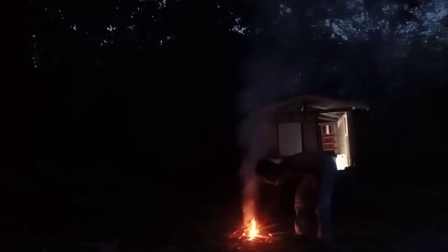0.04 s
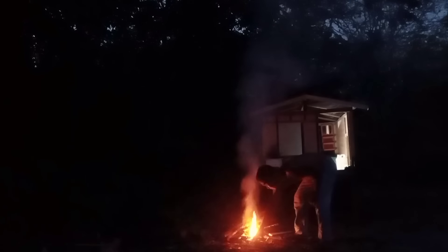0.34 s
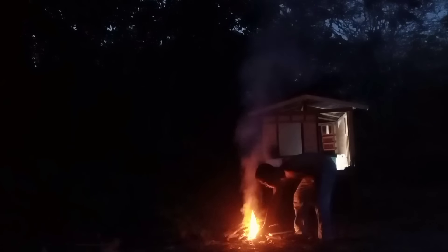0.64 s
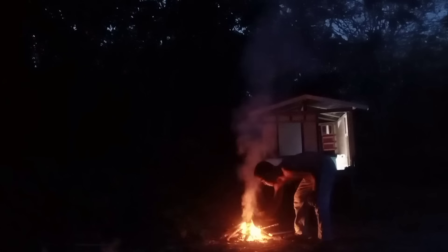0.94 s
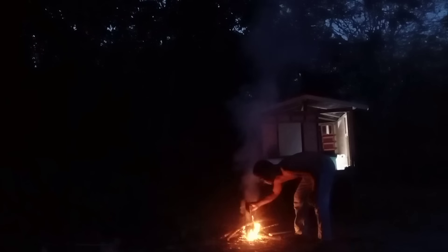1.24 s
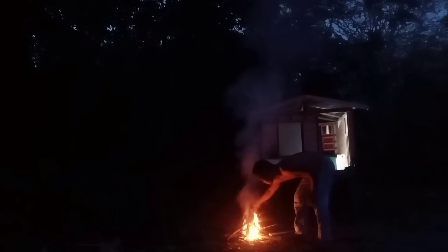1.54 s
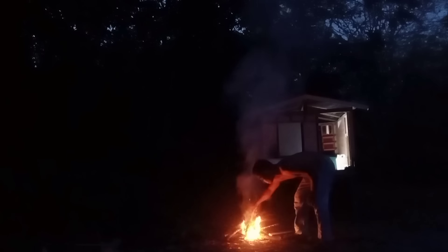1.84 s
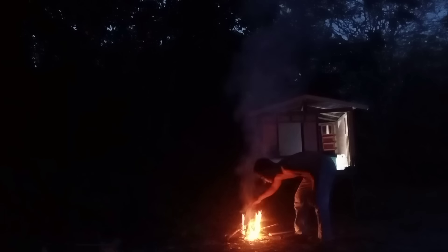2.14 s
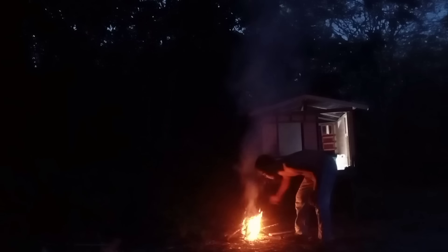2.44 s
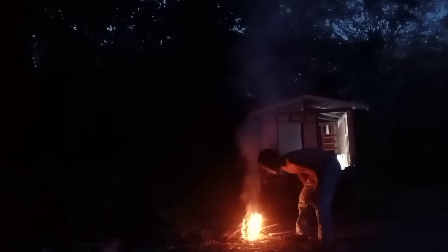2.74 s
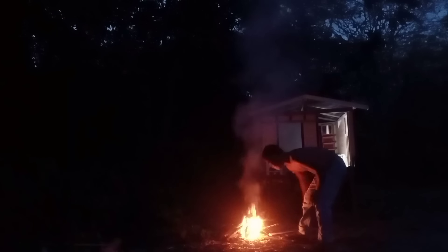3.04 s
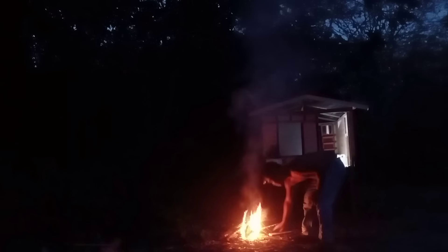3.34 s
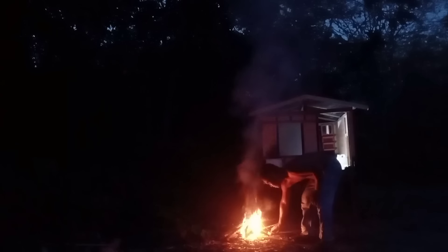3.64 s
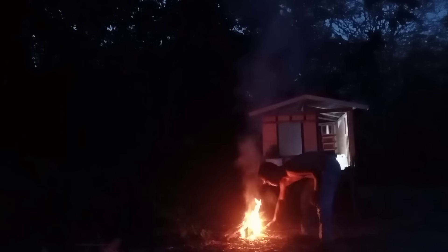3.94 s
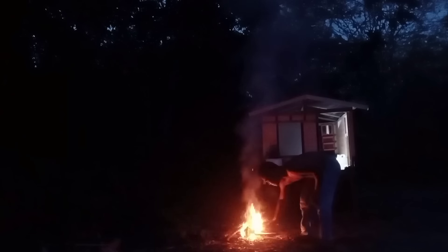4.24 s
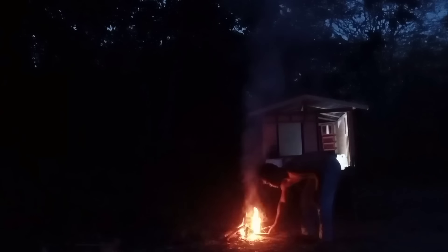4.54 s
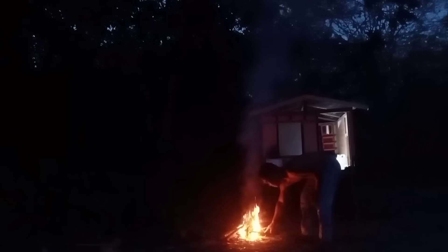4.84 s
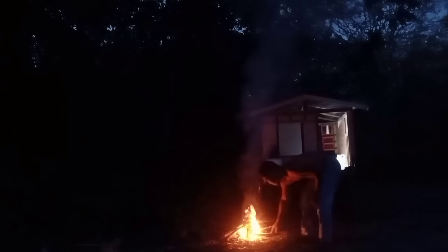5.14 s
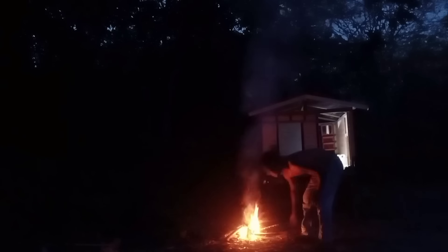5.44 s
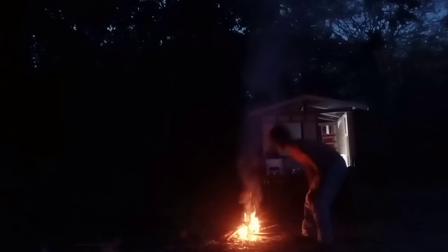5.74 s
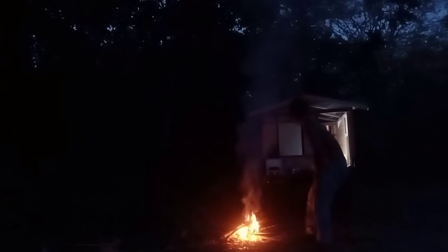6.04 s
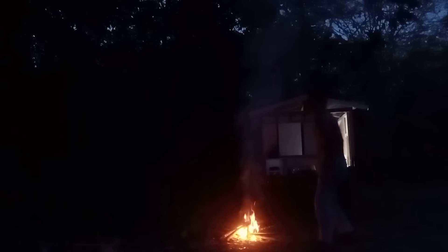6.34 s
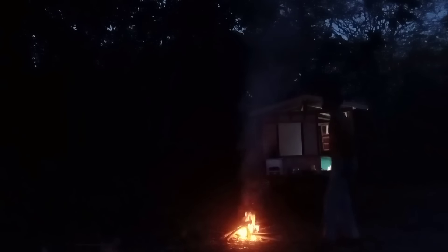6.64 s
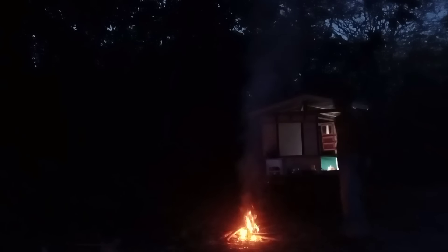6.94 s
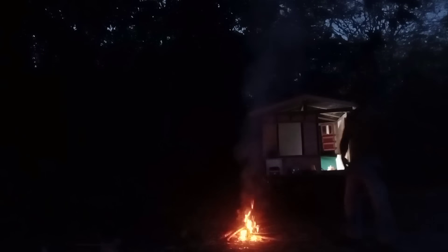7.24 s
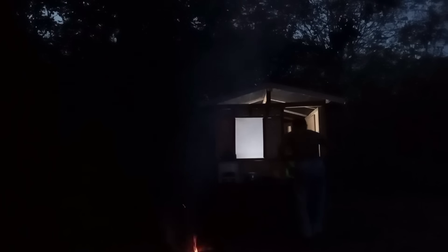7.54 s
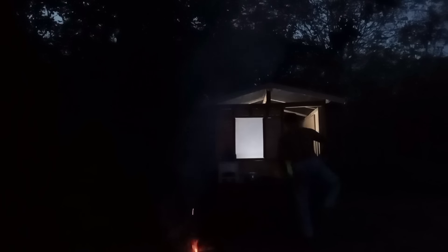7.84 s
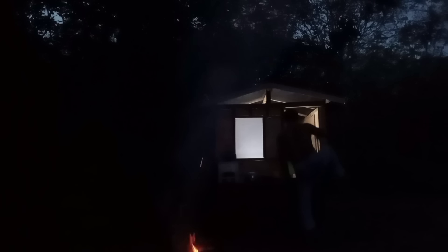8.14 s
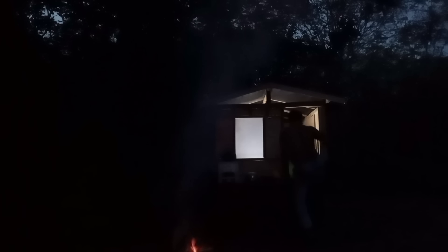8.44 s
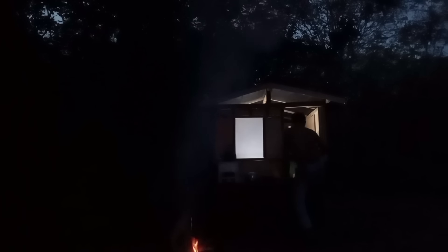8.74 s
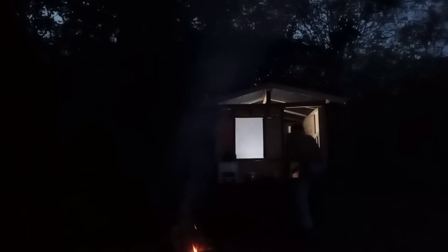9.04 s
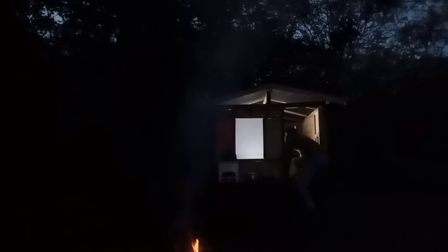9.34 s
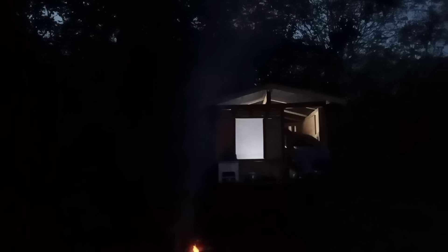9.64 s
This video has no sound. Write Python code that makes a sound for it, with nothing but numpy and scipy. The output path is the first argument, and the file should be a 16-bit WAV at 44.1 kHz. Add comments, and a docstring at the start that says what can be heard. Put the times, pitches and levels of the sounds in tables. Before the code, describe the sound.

Crickets chirp and small frogs whistle in a night forest while a campfire ticks and gives a few sharp snaps.

```python
"""Crickets chirp close to the microphone and small frogs answer with a whistle and a low note.
It is night at a forest clearing. Other crickets sweep down in pitch as their wings slow, bush
crickets hiss in the canopy, more frogs call from far back; the trunks scatter calls into a short wash.
A campfire ticks and snaps while someone feeds it dry twigs and then walks off to a hut."""
import sys
import numpy as np
from scipy import signal
from scipy.fft import rfft, irfft, next_fast_len
from scipy.io import wavfile

SR = 44100
rng = np.random.default_rng(int(sys.argv[2]) if len(sys.argv) > 2 else 0)


def wrap_up_sound(samples):
    """Save the sound to the file named by the first command line argument, as 16-bit audio."""
    columns = np.atleast_2d(samples).T
    # keep every value between -1 and 1, then stretch to whole-number steps
    tamed = np.clip(columns, -1, 1)
    steps = np.round(tamed * 32767).astype(np.int16)
    wavfile.write(sys.argv[1], SR, steps)


N = 435708
TIME = np.arange(N) / SR


def undb(db):
    """Decibels to gain."""
    return 10 ** (np.asarray(db) / 20)


def unit(x):
    """Scale to an rms of one."""
    return x / np.sqrt(np.mean(x ** 2))


def peak(x):
    """Scale to a peak of one."""
    return x / np.max(np.abs(x))


def curve(rows, at=TIME):
    """Read off the straight lines that join (position, value) rows."""
    return np.interp(at, *np.transpose(rows))


def add(out, s, x):
    """Mix x into out from time s on."""
    i = int(round(s * SR))
    x, i = x[max(-i, 0):], max(i, 0)
    out[i:i + len(x)] += x[:max(len(out) - i, 0)]


def equalise(x, points):
    """Filter x by a response of (Hz, dB) points."""
    hz, db = np.transpose(points)
    size = next_fast_len(len(x))
    f = np.maximum(np.fft.rfftfreq(size, 1 / SR), 1)
    return irfft(rfft(x, size) * undb(np.interp(np.log(f), np.log(hz), db)), size)[:len(x)]


def colour(x, points):
    """Filter x by (Hz, dB) points and scale to an rms of one."""
    return unit(equalise(x, points))


def resonate(x, hz, width):
    """A resonance applied twice, for steep skirts."""
    b, a = signal.iirpeak(min(hz, .45 * SR), hz / width, fs=SR)
    return signal.lfilter(b, a, signal.lfilter(b, a, x))


def wander(rate):
    """Random drift with a spread near one, turning rate times a second."""
    steps = rng.standard_normal(2048)
    return np.interp(TIME * rate, np.arange(len(steps)), steps)


def tone(hz, shape):
    """A gliding sine whose rms is one where its envelope is one."""
    return np.sqrt(2) * shape * np.sin(2 * np.pi * (np.cumsum(hz) / SR + rng.random()))


def progress(length):
    """Run from 0 to 1 through a note of this length in seconds."""
    return np.linspace(0, 1, max(int(length * SR), 8))


def waver(u, depth):
    """A gain that wavers around one through a note."""
    return 1 + depth * np.interp(u, np.linspace(0, 1, 8), rng.standard_normal(8))


def swell(s, length, db):
    """A smooth rise and fall centred on time s."""
    return undb(db) * np.exp(-np.minimum((2 * (TIME - s) / length) ** 2, 50))


def echoes(t60, onset, patchy_db=7):
    """The paths from perch to microphone: many weak echoes off leaves, a few strong ones off trunks."""
    t = np.arange(SR // 2) / SR
    sizes = rng.standard_normal(len(t)) * undb(patchy_db * rng.standard_normal(len(t)))
    arrivals = rng.random(len(t)) < .1
    return sizes * arrivals * (1 - np.exp(-t / onset)) * np.exp(-np.log(1000) * t / t60)


def forest(call, paths):
    """The forest scatters a call into a fading wash of the same energy."""
    wash = signal.fftconvolve(call, paths)
    return wash * np.sqrt(np.sum(call ** 2) / np.sum(wash ** 2))


# The air all round the clearing. Each row: frequency in Hz, relative level in dB.
AIR_SPECTRUM = [(20, -23), (40, -8.5), (60, 5), (80, 5), (150, 3.5), (250, -2.5), (500, -7.5),
                (1100, -13.5), (1600, -10.5), (4000, -3.5), (10000, -10), (12500, -26.5), (15500, -21)]
def still_air(level_db=-60.5):
    """A faint bed of noise that stirs slightly."""
    return undb(level_db + wander(5.5)) * colour(rng.standard_normal(N), AIR_SPECTRUM)


# Far off among the trees. Each row: centre in Hz, nominal width in Hz, level in dB.
CHORUS_BANDS = [(1962, 276, -59), (2752, 320, -50.5), (3745, 240, -73), (5340, 540, -57.5),
                (6759, 380, -44)]
def far_chorus(throb_db=2):
    """Countless far callers merge into throbbing bands."""
    out = np.zeros(N)
    for hz, width, db in CHORUS_BANDS:
        band = resonate(rng.standard_normal(N), hz, 1.8 * width)
        band = resonate(band, hz, 1.8 * width)
        out += undb(db + throb_db * wander(11)) * unit(band)
    return out


# The hiss from the canopy overhead. Each row: time in seconds, level in dB.
CANOPY_LEVELS = [(0, -50.5), (.9, -47.5), (2.25, -52.5), (3.1, -45), (4.1, -43.5), (4.8, -44.5),
                 (6.2, -45.5), (6.7, -44.5), (7.5, -44.5), (7.65, -48.5), (9.88, -44.5)]
# Its colour. Each row: frequency in Hz, relative level in dB.
WING_SPECTRUM = [(5800, -37), (6700, -1), (7300, 6.5), (8000, 2), (8700, -1.5), (9500, -5.5), (10200, -27),
                 (11200, -34.5), (12200, -31), (15000, -55)]
def bush_crickets(rasp_db=1.32, ripple_db=2):
    """A rasping hiss, finely rippled with many close peaks."""
    hz = np.arange(5800, 15000, 35)
    wing_db = curve(WING_SPECTRUM, hz) + ripple_db * rng.standard_normal(len(hz))
    level = undb(curve(CANOPY_LEVELS) + rasp_db * wander(110))
    return level * colour(rng.standard_normal(N), np.column_stack([hz, wing_db]))


# Deep in the forest. Each row: start in seconds, number of calls, period in seconds, pitch in Hz,
# level in dB.
DEEP_BOUTS = [(.25, 7, .275, 3050, -48.5), (6.76, 4, 0.19, 3510, -49), (8.68, 3, .24, 3400, -57.5)]
def deep_callers(length=.0612, rise_hz=300):
    """Drawn-out rising calls at an even pace, so distant that only their echoes reach the microphone."""
    out, u = np.zeros(N), progress(length)
    for start, calls, period, hz, db in DEEP_BOUTS:
        for s in start + period * np.arange(calls):
            call = tone(hz + rise_hz * (u - .5), np.sin(np.pi * u))
            add(out, s, undb(db) * forest(call, echoes(t60=.2, onset=.017, patchy_db=-2.5)))
    return out


# Out of sight behind the trees. Each row: pitch in Hz, its spread in Hz, wash level in dB,
# calls per second.
HIDDEN_FROGS = [(2004, 45, -45.5, 8), (2680, 78, -41, 8), (3044, 70, -47, 3)]
def far_frogs(length=.0164, rise_hz=380, scatter_db=2, direct_db=-4):
    """Distant frogs keep a loose rhythm; their short pips are half lost in echoes."""
    out, u = np.zeros(N), progress(length)
    for hz, spread_hz, db, rate in HIDDEN_FROGS:
        for k, (late, sharp, loud) in enumerate(rng.standard_normal((int(rate * N / SR) + 1, 3))):
            pitch = hz + spread_hz * sharp + rise_hz * (u - .5)
            call = undb(db + scatter_db * loud) * tone(pitch, np.sin(np.pi * u))
            s = (k + .2 * late) / rate
            add(out, s, undb(direct_db) * call)
            add(out, s, forest(call, echoes(t60=.094, onset=.014)))
    return out


# Steps and bumps on the clearing's floor. Each row: centre and length in seconds, level in dB,
# pitch in Hz.
GROUND_THUDS = [(1.572, 0.051, -59.5, 330), (4.78, 0.094, -58, 170), (7.534, 0.14, -56, 140),
                (8.782, 0.12, -54, 106), (9.277, 0.19, -60, 83.4), (9.565, 0.27, -64.5, 113),
                (9.79, 0.18, -53, 131)]
def footfalls():
    """The ground answers each step or bump with a dull swell of low noise."""
    return sum(swell(s, length, db) * unit(resonate(rng.standard_normal(N), hz, .98 * hz))
               for s, length, db, hz in GROUND_THUDS)


def grains(rate, uneven_db=.5):
    """Random clicks of uneven size, about rate a second."""
    clicks = (rng.random(N) < rate / SR) * rng.standard_normal(N)
    return clicks * undb(uneven_db * np.minimum(rng.exponential(size=N), 3))


# Leaves and twigs pushed or trodden around the fire. Each row: centre and length in seconds,
# relative level in dB.
LEAF_RUSTLES = [(.62, 0.083, -57.5), (.74, 0.086, -58.5), (.87, 0.096, -60.5), (1.09, 0.21, -56),
                (1.58, 0.2, -68), (1.96, 0.11, -67.5), (3.28, 0.081, -48), (4.31, .31, -64.5),
                (4.42, .051, -57), (5.0, 0.095, -61), (6.59, 0.063, -54.5), (7.54, 0.083, -50),
                (9.35, 0.12, -65.5), (9.78, 0.085, -64)]
# Their colour. Each row: frequency in Hz, relative level in dB.
LEAF_SPECTRUM = [(80, -11), (200, -7), (400, -6.5), (600, -3), (850, -3.5), (1050, -1.5), (1350, 4),
                 (2200, -3), (4000, 0), (9000, -7), (12500, -17), (15000, -19)]
def dry_leaves(gain_db=3, jerk_db=2, twig_db=-7):
    """Dry leaves crunch in jerks of tiny grains and set twigs ringing."""
    twigs = sum(resonate(grains(70), hz, width=150) for hz in np.geomspace(720, 1500, 6))
    crunch = colour(grains(2200), LEAF_SPECTRUM) + undb(twig_db) * unit(twigs)
    pushes = sum(swell(*row) for row in LEAF_RUSTLES)
    return undb(gain_db + jerk_db * wander(60)) * pushes * crunch


# Crickets near and far. Each row: start in seconds, number of calls, base level in dB,
# direct sound in dB against that base.
SWEEP_BOUTS = [(.07, 2, -40.5, -20), (.430, 4, -28, -1.5), (1.415, 2, -40.5, -20), (1.87, 4, -38.5, -26.5),
               (1.98, 3, -38, -20), (2.74, 5, -40, -20), (3.938, 2, -27, -2), (4.535, 2, -28.5, -1),
               (4.99, 10, -41, -20), (7.109, 2, -27, -1.5), (7.55, 1, -39.5, 1), (7.76, 7, -39.5, -20),
               (9.216, 3, -28.5, -1)]
def sweeping_crickets(length=.026, gap=.036, period=.2225, top_hz=5850, bottom_hz=4380, hidden_db=-10):
    """The wing slows in each of three strokes, so each falls in pitch; far callers arrive as wash only."""
    out, u = np.zeros(N), progress(length)
    fall_hz = top_hz + (bottom_hz - top_hz) * u
    for start, calls, db, direct_db in SWEEP_BOUTS:
        for n in range(calls):
            s, call = start - length / 2 + n * period, np.zeros(SR // 7)
            first_db = -3 if n else -5  # a bout's opening stroke is the softest
            for k, size in enumerate(undb([first_db, 0, 0])):
                pitch = fall_hz * (1 + .0082 * rng.standard_normal())
                add(call, k * gap, size * tone(pitch, np.sin(np.pi * u) ** 2.6))
            if direct_db > hidden_db:
                add(out, s, undb(db + direct_db) * call)
                add(out, s, undb(db - 6) * forest(call, echoes(t60=.55, onset=.04, patchy_db=2)))
            else:
                add(out, s, undb(db - 3) * forest(call, echoes(t60=.28, onset=.005, patchy_db=2)))
    return out


def wood_burst(hz, width, decay, tail_db, tail_decay):
    """A crack of noise with a faint scattered tail, rung through one resonance; its peak is one."""
    t = np.arange(SR // 5) / SR
    envelope = np.exp(-t / decay) + undb(tail_db) * np.exp(-t / tail_decay)
    return peak(resonate(rng.standard_normal(len(t)) * envelope, hz, width))


# Burning wood near the microphone. Each row: start in seconds, peak of the crack in dB,
# weight of the wood's body in dB.
FIRE_SNAPS = [(0.275, -31, -17), (0.8749, -34, -12), (1.7775, -30, -16), (2.5238, -32, -20),
              (3.506, -42, -12), (3.726, -39, -15), (4.751, -10.5, -12.5), (5.3640, -20.5, -25),
              (5.4017, -35, -22), (5.615, -33, -10.5), (7.013, -8.5, -11.5), (7.2067, -14, -41)]
# Sticks knocked together at the fireside. Each row: start in seconds, peak in dB, pitch in Hz.
STICK_KNOCKS = [(1.561, -41, 1090), (1.8135, -35.5, 1230), (1.877, -37.5, 810), (2.8235, -48.5, 900),
                (4.42, -45, 880), (9.628, -43, 1240)]
def campfire(thump_db=-16, ticks=55, softest_tick_db=-49, ticks_until_s=7.4):
    """Wood splits with a sharp crack, a duller body and a low thump; sticks knock; embers tick."""
    out = np.zeros(N)
    for s, db, body_db in FIRE_SNAPS:
        crack_hz = np.interp(body_db, [-40, -12], [11000, 7500])  # less body, thinner crack
        crack = wood_burst(crack_hz, width=10200, decay=.00032, tail_db=-29, tail_decay=.019)
        body = wood_burst(hz=1250, width=2600, decay=.0029, tail_db=-15.5, tail_decay=.018)
        thump = wood_burst(hz=320, width=260, decay=.0038, tail_db=-18, tail_decay=.028)
        wood = undb(body_db - 6.5) * (body + undb(thump_db) * thump)
        add(out, s, undb(db) * (crack + wood))
    for s, db, hz in STICK_KNOCKS:
        knock = wood_burst(hz, width=1200, decay=.0044, tail_db=-14.5, tail_decay=.023)
        add(out, s, undb(db) * knock)
    for when, size in rng.random((ticks, 2)):
        tick = wood_burst(hz=11000, width=9000, decay=.0004, tail_db=-28, tail_decay=.005)
        add(out, ticks_until_s * when, undb(softest_tick_db + 10 * size ** 2) * tick)
    return out


# The near frogs' two-note calls. Each row: time in seconds, nominal pitch of the whistle in Hz.
NEAR_FROG_CALLS = [(0.068, 2574), (.24, 2610), (0.444, 2605), (.645, 2620), (.81, 2665), (.985, 2594),
                   (1.17, 2600), (1.509, 2566), (1.71, 2700), (1.974, 2670), (2.25, 2673), (2.473, 2843),
                   (2.679, 2740), (2.889, 2846), (3.078, 2700), (3.336, 2790), (3.535, 2856), (3.735, 2730),
                   (3.884, 2734), (4.063, 2803), (4.302, 2820), (4.455, 2920), (4.64, 2780), (4.794, 2950),
                   (4.978, 2760), (5.181, 2950), (5.329, 2815), (5.486, 3006), (5.632, 2804), (5.781, 3014),
                   (5.938, 2787), (6.063, 3065), (6.177, 2860), (6.309, 2845), (6.441, 3070), (6.566, 2840),
                   (6.731, 2937), (6.95, 3106), (7.103, 2750), (7.161, 2867), (7.285, 2770), (7.392, 3036),
                   (7.55, 2950), (7.737, 2730), (7.873, 2954), (8.069, 2925), (8.228, 2940), (8.333, 2743),
                   (8.44, 2776), (8.564, 2926), (8.671, 2760), (8.793, 2786), (8.936, 2948), (9.073, 2816),
                   (9.181, 2780), (9.314, 2994), (9.497, 2720), (9.612, 2800), (9.715, 2945), (9.833, 2800)]
# They work each other up and calm down. Each row: time in seconds, base levels of the whistle
# and of the low note in dB.
FROG_MOOD = [(0, -36.5, -48.5), (1.5, -44, -47), (3.1, -40.5, -42), (4.7, -38.5, -40), (5.5, -37, -39.5),
             (7, -38.5, -40), (7.8, -40, -46), (9.85, -39, -49)]
USUAL_WHISTLE_HZ = 2792
def frog_calls(effort_db_per_hz=.0125):
    """Each call's time, pitch and two base levels; a harder whistle is both higher and louder."""
    s, hz = np.transpose(NEAR_FROG_CALLS)
    when, whistle_db, peep_db = np.transpose(FROG_MOOD)
    effort_db = effort_db_per_hz * (hz - USUAL_WHISTLE_HZ)
    return zip(s, hz, np.interp(s, when, whistle_db) + effort_db, np.interp(s, when, peep_db))


def frog_whistles(direct_db=3, wash_db=2.5, rise_hz_per_s=15000, scoop_hz=330, under_db=-27):
    """A whistle swells unevenly, climbs and stops short; high ones last longer and add the octave below."""
    out = np.zeros(N)
    for s, hz, db, _ in frog_calls():
        length = np.interp(hz, [2750, 3050], [.017, .04])
        u = progress(length)
        t = (u - .68) * length  # seconds from about the crest of the note
        pitch = hz + 20 + rise_hz_per_s * t - scoop_hz * np.exp(-u / .16)  # the throat scoops in
        shape = np.sin(np.pi * u ** 1.4) ** .8 * waver(u, depth=.49)
        call = tone(pitch, shape) + undb(under_db) * (hz > 2950) * tone(pitch / 2, shape ** 2)
        nearness = np.clip(undb(db + 37), .55, 1)  # quiet calls carry less direct sound
        wash = forest(call, echoes(t60=.42, onset=.0019, patchy_db=4.5))
        start = s - .004 + t[0]
        add(out, start, undb(db + direct_db) * nearness * call)
        add(out, start, undb(db + wash_db) * wash)
    return out


# The low note's octave, straight at the microphone. Each row: time in seconds, relative strength in dB.
PEEP_OCTAVE = [(0, -37), (7.4, -23), (7.9, 0), (9.8, 0.5)]
def frog_peeps(length=.025, lag=.01, usual_hz=1981.4, direct_db=5, wash_db=-2.5, octave_wash_db=-13):
    """The low second note scoops up and levels off; its octave is beamed ahead, else heard as echo."""
    out, u = np.zeros(N), progress(length)
    for s, whistle_hz, _, db in frog_calls():
        hz = usual_hz + .27 * (whistle_hz - USUAL_WHISTLE_HZ)
        scoop_hz = 300 + 90 * rng.standard_normal()
        pitch = hz + 45 - scoop_hz * (1 - u) ** 3
        shape = np.sin(np.pi * u) ** 1.3 * waver(u, depth=.2)
        note, octave = tone(pitch, shape), tone(2 * pitch, shape ** 2)
        paths = echoes(t60=.15, onset=.0014, patchy_db=14.5)
        wash = forest(note + undb(octave_wash_db) * octave, paths)
        octave_db = curve(PEEP_OCTAVE, s) + 7.7 * (rng.random() - 1.25)
        start = s + lag - length / 2
        add(out, start, undb(db + direct_db) * (note + undb(octave_db) * octave))
        add(out, start, undb(db + wash_db) * wash)
    return out


# Three crickets, nearest to the microphone first. Each row: nominal pitch in Hz, direct level in dB,
# wash level in dB, build-up of the wash in seconds, chirp times in seconds.
CRICKET_PERCHES = [(6801, -24.5, -28.5, .003, [.068, 0.499, .968, 1.372, 1.819, 2.268, 2.765, 3.148, 3.98, 4.505, 4.924, 5.384, 5.802, 6.278, 6.79, 7.264, 7.833, 8.247, 8.676, 9.152, 9.585]),
                   (6727, -29, -30.5, 0.00088, [0.699, .916, 1.655, 2.499, 3.573, 3.761, 4.441, 4.859, 5.043, 6.014, 6.613, 7.347]),
                   (6613, -34, -30, 0.0072, [.02, .45, 1.438, 2.05, 2.73, 3.343, 3.95, 5.465, 6.23, 6.755, 7.175, 7.568, 7.79, 7.94, 8.468, 8.945, 9.343, 9.54, 9.79])]
def chirping_crickets(bend_hz=300, flick_db=2.5, scatter_hz=24.9, scatter_db=.5, lead=.0105):
    """A short wing flick, then a longer stroke whose pitch arches; each cricket keeps to its perch."""
    out, stroke_u, flick_u = np.zeros(N), progress(.02164), progress(.0082)
    stroke_shape = np.sin(np.pi * stroke_u ** .9) ** .9
    for own_hz, direct_db, wash_db, build_up, times in CRICKET_PERCHES:
        perch = echoes(t60=.6, onset=build_up)
        for s in times:
            hz = own_hz + scatter_hz * rng.standard_normal()
            size = undb(scatter_db * rng.standard_normal())
            flick = tone(np.full(len(flick_u), hz - 70), np.sin(np.pi * flick_u))
            stroke = tone(hz + 80 - bend_hz * (2 * stroke_u - .8) ** 2, stroke_shape)
            call = np.zeros(SR // 16)
            add(call, 0, undb(flick_db) * flick)
            add(call, .0056, stroke)
            add(out, s - lead, size * undb(direct_db) * call)
            add(out, s - lead + .005, size * undb(wash_db) * forest(call, perch))  # echoes 5 ms later
    return out


def scene():
    """The whole clearing from one spot, in mono."""
    air = still_air()
    insects = chirping_crickets() + sweeping_crickets() + bush_crickets() + far_chorus()
    frogs = frog_whistles() + frog_peeps() + far_frogs() + deep_callers()
    camp = campfire() + footfalls() + dry_leaves()
    return (air + insects + frogs + camp)[None]


# The microphone's port. Each row: frequency in Hz, gain in dB.
MIC_RESPONSE = [(20, -6), (10500, 2), (11500, -0.5), (12500, -10.5), (14000, -1.5), (15200, 8), (15800, -9)]
def record(dry, top_hz=15800):
    """The microphone colours the treble and the recorder cuts the top."""
    lowpass = signal.ellip(10, .2, 70, top_hz, fs=SR, output="sos")
    return signal.sosfilt(lowpass, equalise(dry[0], MIC_RESPONSE))[None]


dry = scene()
out = record(dry)
wrap_up_sound(out)
```